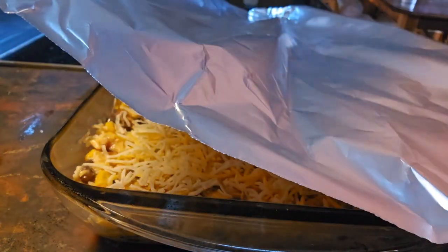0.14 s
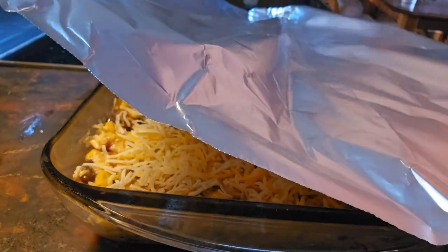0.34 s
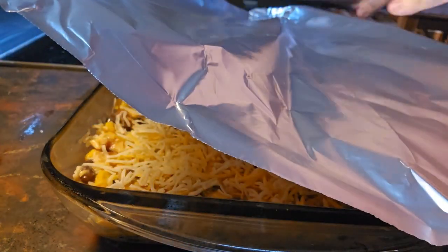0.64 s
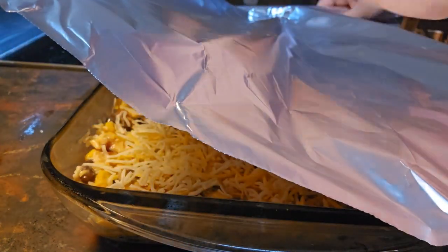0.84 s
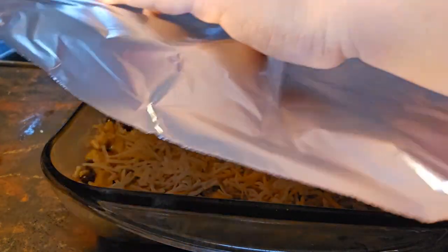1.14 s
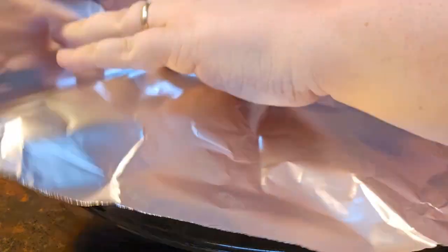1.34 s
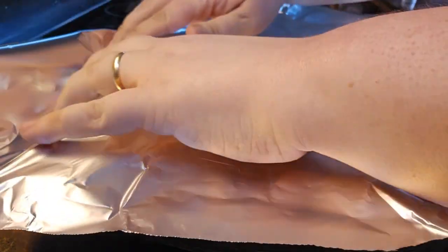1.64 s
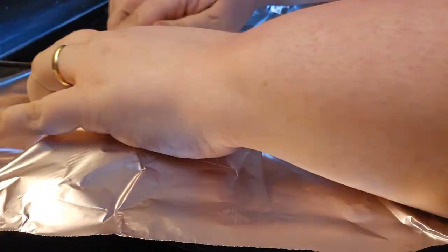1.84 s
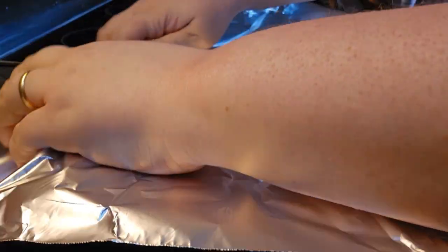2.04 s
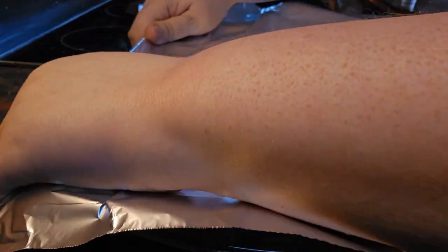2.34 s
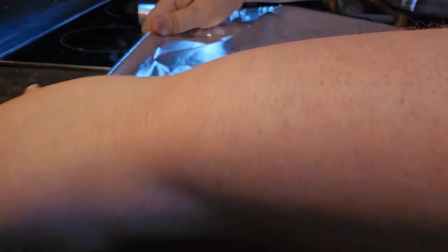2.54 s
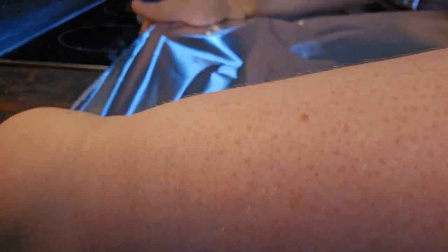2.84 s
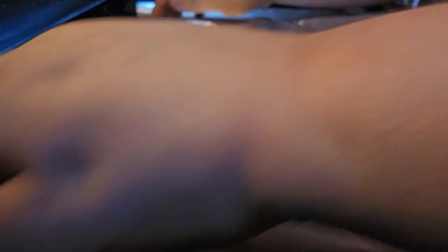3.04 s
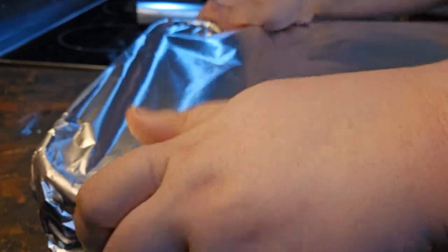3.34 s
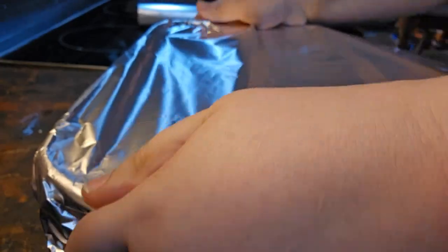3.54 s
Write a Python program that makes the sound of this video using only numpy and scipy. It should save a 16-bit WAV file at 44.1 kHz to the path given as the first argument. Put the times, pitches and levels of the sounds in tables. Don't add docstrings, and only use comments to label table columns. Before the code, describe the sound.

Crisp foil crumpling in busy strokes, preceded by a hard counter knock and soft thuds.

```python
import sys
import numpy as np
from scipy import signal
from scipy.fft import rfft, irfft, next_fast_len
from scipy.io import wavfile
from scipy.ndimage import uniform_filter1d

SR = 44100
rng = np.random.default_rng(int(sys.argv[2]) if len(sys.argv) > 2 else 0)


def natural_amplitude(level_db):
    exponent = np.asarray(level_db, float) / 20
    return 10 ** exponent


def unload_wav(signal):
    wavfile.write(
        sys.argv[1],
        SR,
        np.round(np.clip(np.atleast_2d(signal).T, -1, 1) * 32767).astype(np.int16),
    )


N = 163170


def rms_one(x):
    return x / np.sqrt(np.mean(x ** 2) + 1e-20)


def cut(x, hz, kind, order):
    return signal.sosfilt(signal.butter(order, hz, kind, fs=SR, output="sos"), x)


def at_hz(points, hz):
    points_hz, points_db = np.transpose(points)
    return np.interp(np.log(hz), np.log(points_hz), points_db)


def shaped(x, spectrum):
    size = next_fast_len(N)
    hz = np.maximum(np.arange(size // 2 + 1) * SR / size, 1)
    return irfft(rfft(x, size) * natural_amplitude(at_hz(spectrum, hz)), size)[:, :N]


def coloured(spectrum, channels):
    return rms_one(shaped(rng.standard_normal((channels, next_fast_len(N))), spectrum))


def drift(rate_hz):
    r = np.exp(-40 * np.pi * rate_hz / SR)
    noise = rng.standard_normal(N // 20 + 2002)
    slow = signal.lfilter([1], [1, -2 * r, r * r], noise)[2000:]
    return np.interp(np.arange(N) / 20, np.arange(len(slow)), rms_one(slow))


def ring(clicks, hz, t60_s):
    r, w = natural_amplitude(-60 / (t60_s * SR)), 2 * np.pi * hz / SR
    return signal.lfilter([0, np.sin(w)], [1, -2 * r * np.cos(w), r * r], clicks + 1e-18)


def clicks_at(rows):
    out = np.zeros(N)
    for s, db, *_ in rows:
        out[int(s * SR)] += natural_amplitude(db)
    return out


def swells(rows):
    t = np.arange(0, N, 16) / SR
    power = 1e-11
    for s, db, rise_s, fall_s in rows:
        rise = np.exp(-((t - s) / rise_s) ** 2)
        fall = np.exp(-np.abs(t - s) / fall_s)
        power = power + natural_amplitude(2 * db) * np.where(t < s, rise, fall)
    return np.interp(np.arange(N) / SR, t, np.sqrt(power))


def crack(start_s, db, fall_s):
    t = np.arange(N) / SR - start_s
    return natural_amplitude(db) * rng.standard_normal(N) * (t > 0) * np.exp(-np.abs(t) / fall_s)


def placed(x, left_db, lag_s):
    late = np.interp(np.arange(N) - lag_s * SR, np.arange(N), x)
    return np.array([natural_amplitude(left_db) * x, natural_amplitude(-left_db) * late])


def hand_effort():
    # peak time in seconds, level in dB, rise in seconds, fall in seconds.
    strokes = [(0.98, -18.5, 0.0084, 0.015), (0.998, -25.5, 0.012, 0.13), (1.051, -20.5, 0.03, 0.11),
               (1.22, -32, 0.026, .02), (1.148, -21.5, 0.011, 0.0078), (1.259, -19, 0.041, 0.055),
               (1.334, -14, 0.022, 0.049), (1.48, -18, 0.019, 0.11), (1.638, -21.5, 0.0061, 0.055),
               (1.698, -24.5, 0.0015, 0.011), (1.742, -21.5, 0.0072, 0.01), (1.768, -25.5, 0.015, 0.0028),
               (1.846, -20.5, 0.079, 0.0074), (1.896, -14, 0.027, 0.21), (1.96, -12, 0.0053, 0.013),
               (2.022, -16, 0.0077, 0.18), (2.256, -15, 0.014, 0.0089), (2.295, -14.5, 0.0043, 0.0082),
               (2.32, -32.5, 0.026, 0.033), (2.48, -18, 0.01, 0.014), (2.55, -19.5, 0.1, 0.13),
               (2.593, -18, 0.019, 0.0028), (2.642, -21.5, 0.01, 0.024), (2.758, -14.5, 0.024, 0.0082),
               (2.84, -17, 0.032, 0.027), (2.938, -22, 0.021, 0.0078), (2.968, -21, 0.0086, 0.0087),
               (3.008, -32, 0.0052, 0.019), (3.079, -26, 0.0063, 0.028), (3.126, -27.5, 0.01, 0.042),
               (3.24, -21.5, 0.051, 0.027), (3.305, -14, 0.066, 0.025), (3.421, -15, 0.061, 0.048),
               (3.578, -23.5, 0.023, 0.051)]
    # peak time in seconds, level in dB, rise in seconds, fall in seconds.
    stirs = [
        (.015, -44.5, 0.047, 0.043),
        (.075, -48, 0.018, 0.013),
        (0.123, -36.5, 0.015, 0.018),
        (0.234, -39.5, 0.012, 0.047),
        (.45, -47.5, 0.019, 0.012),
        (0.574, -51, 0.01, 0.095),
        (.909, -45, 0.0011, 0.005),
        (0.935, -35, 0.0013, 0.0025),
        (0.948, -32.5, 0.0029, 0.011),
    ]
    return swells([*strokes, *stirs])


def foil(effort):
    # frequency in Hz, level in dB.
    foil_colour = [(600, -33), (1030, -31), (1700, -60.5), (4500, 10.5), (8500, 15), (12000, 3),
                   (16000, -0.5)]
    # time in seconds, tilt in dB per octave.
    tightness = [(.95, 1), (1.1, 4.95), (1.299, 0.9), (1.45, 3.4), (1.6, 1.5), (1.8, -0.1), (1.95, -1.6),
                 (2.15, -4.15), (2.3, -1), (2.4, -0.6), (2.55, 2.2), (2.7, 0.1), (2.9, 0.9), (3.02, 10.5),
                 (3.1, 0), (3.25, 0), (3.42, 0.1), (3.6, 3.3)]
    creases_per_s, spread_db, clump_db = 5000, 2.2, 1.3
    patchy_db, brightens, crease_cycles = 1.1, 0.37, 15
    sizes_db = spread_db * np.minimum(rng.exponential(1, (3, N)), 5) + clump_db * drift(160)
    sizes = natural_amplitude(sizes_db) * rng.choice([-1, 1], (3, N))
    creases = rms_one(sizes * (rng.random((3, N)) < creases_per_s / SR))
    patch = rng.integers(0, 5, (3, N))
    tilt_db = np.interp(np.arange(N) / SR, *np.transpose(tightness))
    out, shared = 0, 0
    for k, hz in enumerate(np.geomspace(600, 16500, 40)):
        if k % 6 == 0:
            shared = drift(1.9)
        octaves = np.log2(hz / 4000)
        gain = effort * natural_amplitude(patchy_db * (shared + 2 * drift(30)) + tilt_db * octaves)
        gain = gain * (effort / 0.042) ** (brightens * octaves)
        rung = rms_one(ring(creases * (patch == k % 5), hz, crease_cycles / hz))
        out = out + natural_amplitude(at_hz(foil_colour, hz)) * np.sqrt(hz) * rung * gain
    out = natural_amplitude(-4.5) * out * np.sqrt(np.mean(effort ** 2) / np.mean(out ** 2))
    near = cut(out[0], 816, "high", order=4)
    far = natural_amplitude(4) * cut(out[1:], 890, "high", order=2)
    return near, far


def snaps():
    # peak time in seconds, level in dB, rise in seconds, fall in seconds.
    open_folds = [(.107, -48, 0.0013, 0.0023), (1.306, -17.5, 0.0017, 0.0068), (1.442, -18, 0.0035, 0.0044),
                  (1.566, -26, 0.0017, 0.0042), (1.632, -27.5, 0.0016, 0.007), (1.696, -30, 0.0014, 0.0017),
                  (1.718, -32.5, 0.0012, 0.0012), (1.738, -27.5, 0.0014, 0.0021),
                  (1.763, -32, 0.0013, 0.0014), (1.84, -33, .002, 0.0027), (1.873, -25, 0.0017, 0.0047),
                  (2.066, -21, 0.0048, 0.021), (2.23, -35.5, .002, .004), (2.352, -29.5, .0015, 0.0037),
                  (2.375, -16, 0.00076, 0.002), (2.411, -26, 0.00075, 0.0023), (2.473, -31.5, 0.0016, .005),
                  (2.496, -25.5, 0.00064, 0.0045), (2.732, -30, .002, 0.0072),
                  (2.826, -32.5, 0.0015, 0.0031), (2.966, -39.5, 0.0024, 0.0049),
                  (3.005, -34, 0.0017, 0.011), (3.077, -47.5, .001, 0.0023), (3.126, -29, 0.00088, .002),
                  (3.185, -30, 0.0024, 0.0093), (3.387, -16.5, 0.0011, 0.0068)]
    # peak time in seconds, level in dB, rise in seconds, fall in seconds.
    palm_folds = [(.575, -64.5, 0.0032, 0.005), (1.875, -30, 0.001, 0.024), (2.015, -33.5, 0.0039, 0.0042),
                  (2.041, -31.5, 0.0014, 0.018), (2.27, -28.5, 0.0029, 0.0065),
                  (2.297, -34.5, 0.0023, .006), (2.336, -32, 0.00092, 0.0072),
                  (2.472, -27.5, 0.0015, 0.0019), (2.495, -34, 0.0013, 0.0013),
                  (2.564, -38.5, 0.0015, 0.0053), (2.638, -40.5, 0.0036, .008),
                  (2.963, -31.5, .002, 0.0017), (3.111, -38, .002, 0.0067), (3.14, -34, 0.0045, .003),
                  (3.232, -30, 0.0024, 0.0038), (3.29, -37.5, 0.0036, 0.0097)]
    spit = rng.standard_normal((2, N)) * natural_amplitude(3.3 * np.minimum(rng.exponential(1, N), 3))
    bright = rms_one(cut(spit, 3500, "high", order=1))
    dull = rms_one(cut(spit, [636, 2400], "band", order=1))
    return natural_amplitude(5) * (swells(open_folds) * bright + swells(palm_folds) * dull)


def pops():
    # start in seconds, peak level in dB, pitch in Hz.
    pop_rows = [
        (2.296, -15, 1020),
        (2.471, -21, 845),
        (2.494, -17, 720),
        (2.637, -26, 1010),
        (2.938, -18, 4700),
        (2.962, -13, 1340),
        (3.076, -26, 3910),
        (3.11, -29, 1140),
        (3.231, -19, 960),
        (3.39, -21, 1980),
    ]
    t60_s, rise_s = 0.04, 0.003
    out = np.zeros(N)
    for s, db, hz in pop_rows:
        u = np.maximum(np.arange(N) / SR - s, 0)
        out += 2 * natural_amplitude(db - 60 * u / t60_s) * (1 - np.exp(-u / rise_s)) * np.sin(2 * np.pi * hz * u)
    return out


def squeak():
    # time in seconds, pitch in Hz, level in dB.
    path = [
        (2.512, 7500, -45),
        (2.518, 7550, -21),
        (2.523, 7600, -32),
        (2.528, 7600, -19),
        (2.535, 8300, -24),
        (2.542, 8800, -21),
        (2.55, 8900, -32),
        (2.558, 8900, -25),
        (2.567, 9000, -45),
    ]
    s, hz, db = np.transpose(path)
    t = np.arange(N) / SR
    pitch_hz = np.interp(t, s, hz) * (1 + 0.006 * drift(330))
    level_db = np.interp(t, s, db, left=-120, right=-120) + 9.1 * drift(230)
    return np.sin(2 * np.pi * np.cumsum(pitch_hz) / SR) * natural_amplitude(level_db)


def knock():
    # start in seconds, level in dB.
    touches = [
        (.239, -1.5),
        (.2425, -20),
        (.246, -4),
    ]
    # frequency in Hz, level in dB, T60 in seconds.
    knock_modes = [(63.4, -21, 0.98), (111.8, -6.5, 0.24), (172, -13.5, 0.39), (216.3, -9, 0.43),
                   (348, -20, 0.42), (640, -8, 0.015), (751, -22.5, 0.023), (1030, -6.5, 0.016),
                   (1150, -10.5, 0.037), (1490, -9.5, 0.035), (2630, -55, 0.0035)]
    clicks = clicks_at(touches)
    burst = sum(crack(s, db - 6, fall_s=0.0084) for s, db in touches)
    out = cut(burst, 5000, "low", order=1) + natural_amplitude(-13.5) * counter(clicks)
    for k, (hz, db, t60_s) in enumerate(knock_modes):
        out += (-1) ** k * natural_amplitude(db) * ring(clicks, hz, t60_s)
    return out


def thuds():
    # start in seconds, peak level in dB, pitch in Hz, swell in cycles.
    thud_rows = [(0.779, -5, 147.7, 1.06), (0.8705, -8.5, 158, 1.07), (1.0276, -7.5, 148.7, 1.18),
                 (1.301, -18, 211, 1.6), (1.322, -19, 270, 1.3), (1.86, -24, 184, 4),
                 (2.055, -22.5, 125.4, 4.1), (2.112, -34.5, 122.7, 1), (2.249, -18, 299, 2.2),
                 (2.282, -46, 101, 4.4), (2.328, -30, 117, 2.4), (2.434, -26.5, 148, 5.5),
                 (2.483, -14, 277, 5.6), (2.692, -25.5, 106.4, 3.5), (2.747, -26, 172, 5.1),
                 (2.96, -23, 287, 4.4), (3.233, -31.5, 261, 3.7), (3.297, -21, 207, 4.9),
                 (3.385, -30.5, 122.3, 6.4), (3.438, -25.5, 140, 4.0), (3.538, -32.5, 127, 1.8)]
    # frequency in Hz, level in dB, T60 in seconds.
    cupboard = [(127.4, -8, 0.55), (177.4, -5.5, 0.2), (248, -7, 0.092)]
    shelf_hz, shelf_t60_s, thud_cycles = 352, 0.14, 4.5
    pushes, t = np.zeros(N), np.arange(N) / SR
    for s, db, hz, swell_cycles in thud_rows:
        swell = np.sin(np.pi * np.clip((t - s) * hz / swell_cycles, 0, 1)) ** 2
        push = natural_amplitude(db) * swell * np.sin(2 * np.pi * hz * (t - s)) * 4 * hz / SR / swell_cycles
        pushes += ring(push, hz, thud_cycles / hz)
    below = sum(natural_amplitude(db) * hz / SR * ring(pushes, hz, t60_s) for hz, db, t60_s in cupboard)
    clicks = clicks_at(thud_rows)
    shelf = ring(cut(clicks, 2 * shelf_hz, "low", order=2), shelf_hz, shelf_t60_s)
    return pushes + below + natural_amplitude(-24) * shelf + natural_amplitude(-19.5) * counter(clicks)


def counter(x):
    # frequency in Hz, level in dB per Hz.
    boom_colour = [(55, 8.5), (120, 17), (200, 6.5), (300, 0.5), (520, -8), (1100, -21.5), (2500, -44),
                   (7000, -70.5)]
    t60_s, late_t60_s, late_db, rise_s = 0.29, 1, -17, 0.00072
    t = np.arange(SR) / SR
    decay = natural_amplitude(-60 * t / t60_s) + natural_amplitude(late_db - 60 * t / late_t60_s)
    boom = coloured(boom_colour, channels=1)[0, :SR] * decay
    return signal.fftconvolve(x, boom * np.minimum(t / rise_s, 1))[:N]


def tick():
    # start in seconds, level in dB.
    tick_rows = [
        (.7472, 0),
        (.7518, -4),
    ]
    # frequency in Hz, level in dB, T60 in seconds.
    tick_modes = [(5700, -2, .009), (5900, 0, .012), (6150, -4, .008), (3450, -11, .008), (8730, -7, .006)]
    hit = sum(crack(s, db, fall_s=0.0025) for s, db in tick_rows)
    modes = sum(natural_amplitude(db - 37) * ring(hit, hz, t60_s) for hz, db, t60_s in tick_modes)
    return natural_amplitude(-22) * cut(hit, 4000, "high", order=1) + modes


def rumble(effort):
    # frequency in Hz, level in dB per Hz.
    rumble_colour = [(30, -19.5), (45, -9), (110, -8.5), (200, -5.5), (350, -8), (480, -12), (600, -14)]
    follow = uniform_filter1d(effort / 0.03, size=2000) ** 0.85
    return follow * natural_amplitude(-44.5 - drift(2.1)) * coloured(rumble_colour, channels=2)


def kitchen(x):
    bright_t60_s, dull_t60_s = 0.083, 0.29
    t = np.arange(SR // 2) / SR
    bright, dull = rng.standard_normal((2, 2, len(t)))
    dull = cut(dull, 2470, "low", order=1)
    echo = bright * natural_amplitude(-60 * t / bright_t60_s) + 2 * dull * natural_amplitude(-60 * t / dull_t60_s)
    echo = echo * (t > 0.003)
    return signal.fftconvolve(x[None], echo / np.sqrt(np.sum(echo ** 2) / 2), axes=1)[:, :N]


def room_tone():
    # frequency in Hz, level in dB per Hz.
    tone_colour = [(30, 12), (50, -0.5), (130, 2.5), (250, -13), (350, -7.5), (500, -37), (1500, -43),
                   (12000, -41)]
    mid, side = natural_amplitude(-50.5) * coloured(tone_colour, channels=2)
    return np.array([mid + 0.1 * side, mid - 0.25 * side])


def scene():
    left_db, low_left_db = 2.3, 1.35
    effort = hand_effort()
    near, far = foil(effort)
    sheet = near + squeak() + tick()
    folds = snaps()
    hard = knock()
    wet = kitchen(natural_amplitude(-5.5) * (sheet + folds[0]) + natural_amplitude(-14.5) * cut(hard, 460, "high", order=2))
    rub, rub_apart = rumble(effort)
    out = placed(sheet + pops(), left_db, lag_s=15 / SR)
    out += placed(hard + thuds() + rub, low_left_db, lag_s=0.0001)
    out += (far + folds + wet) * natural_amplitude([[left_db], [-left_db]])
    return out + 0.4 * rub_apart * [[1], [-1]] + room_tone()


def low_pass(x):
    return signal.sosfilt(signal.butter(12, 16670, fs=SR, output="sos"), x)


def record(dry):
    # frequency in Hz, level in dB.
    mic_colour = [(430, 4), (545, -6.5), (690, -1), (9350, -4.5), (9800, -6.5), (12200, -1)]
    end_s, fade_s = 3.606, 0.0012
    heard = cut(np.tanh(shaped(dry, mic_colour)), 48, "high", order=3)
    heard = signal.sosfilt(signal.cheby2(14, 70, 16500, fs=SR, output="sos"), heard)
    fade = np.exp(-np.maximum(np.arange(N) / SR - end_s, 0) / fade_s)
    return low_pass(heard * fade)


dry = scene()
out = record(dry)
unload_wav(out)
```